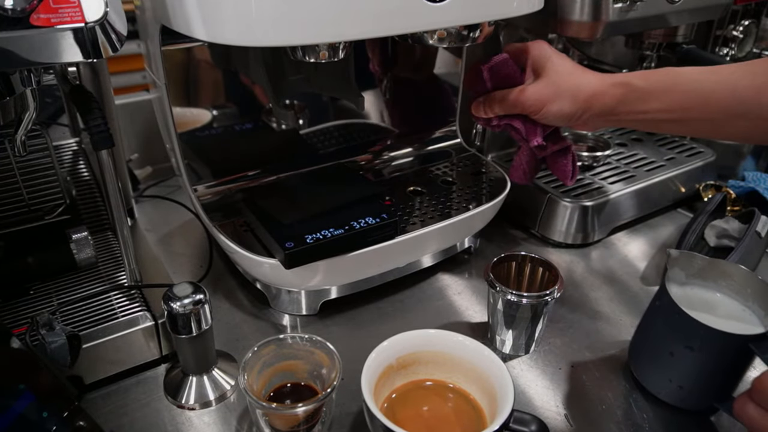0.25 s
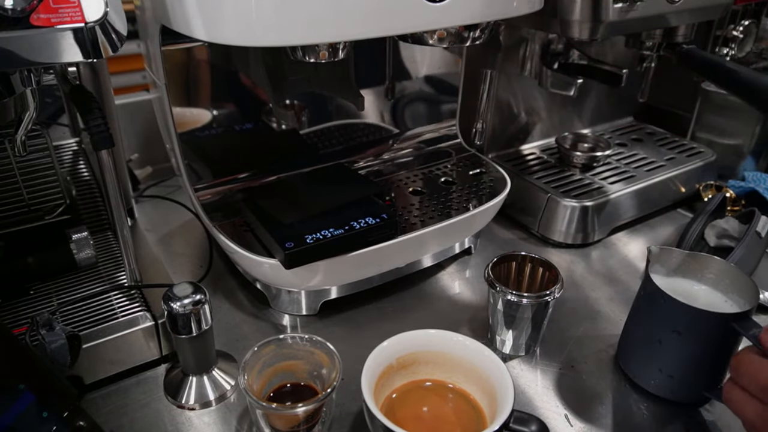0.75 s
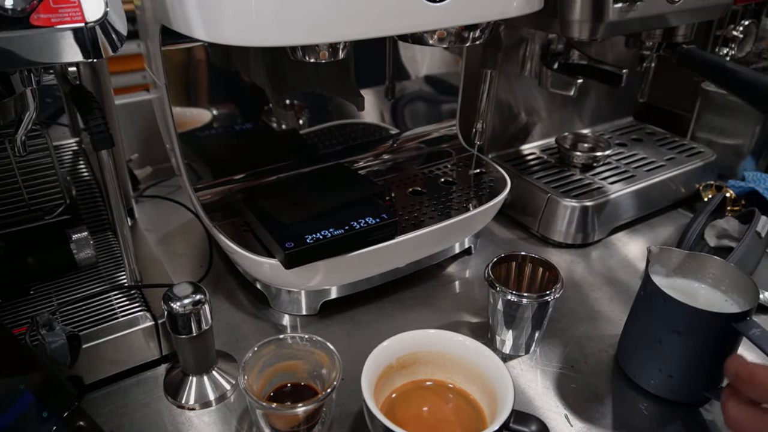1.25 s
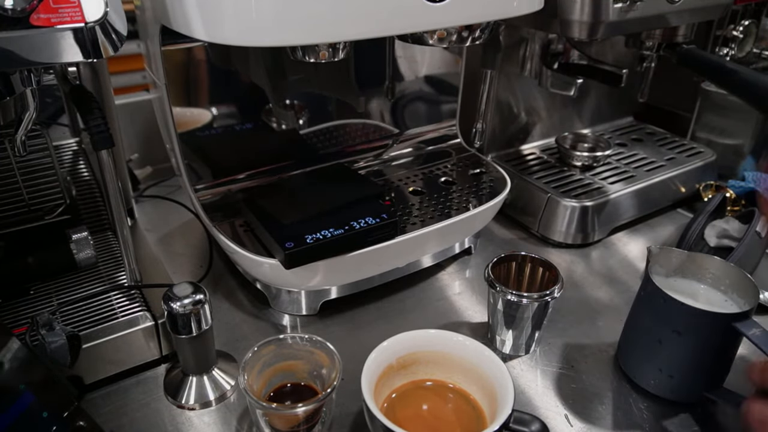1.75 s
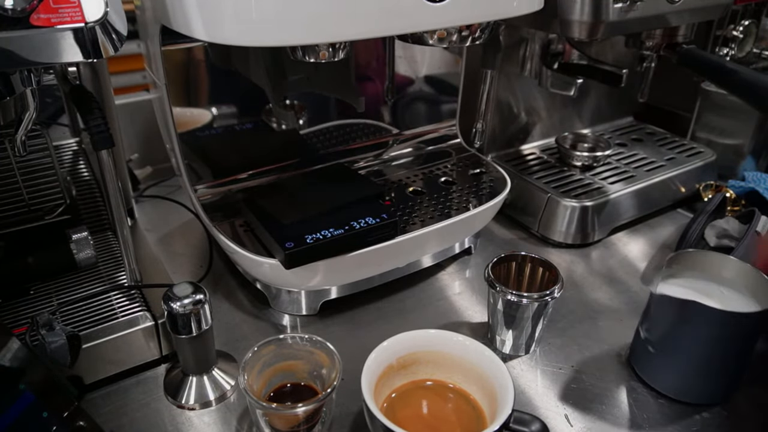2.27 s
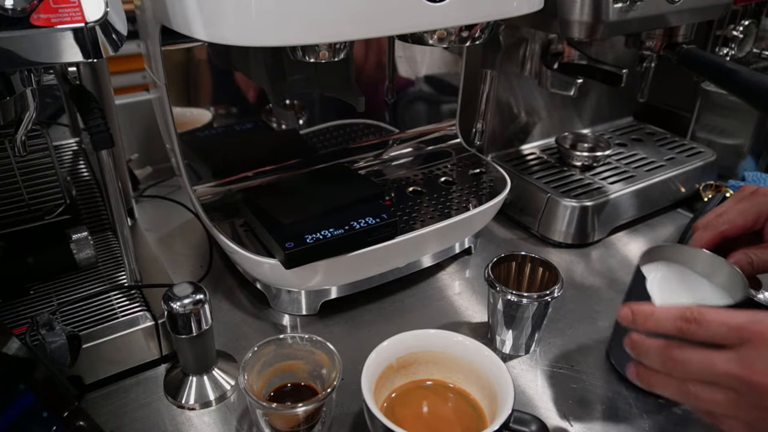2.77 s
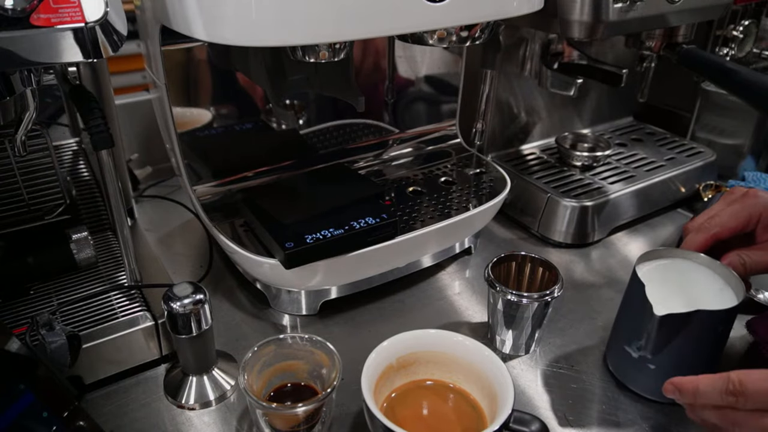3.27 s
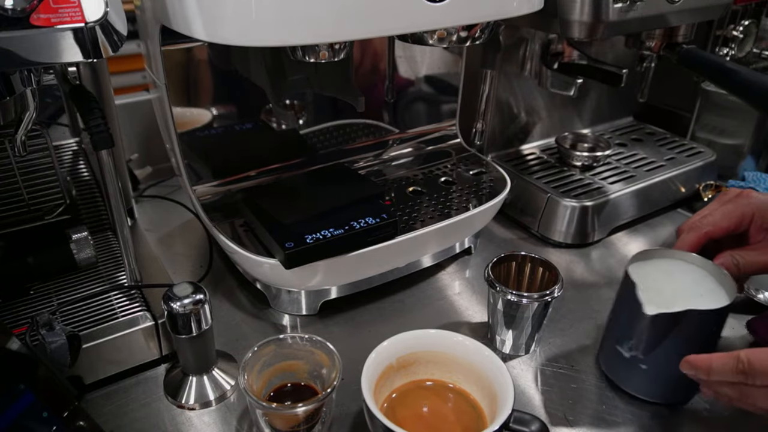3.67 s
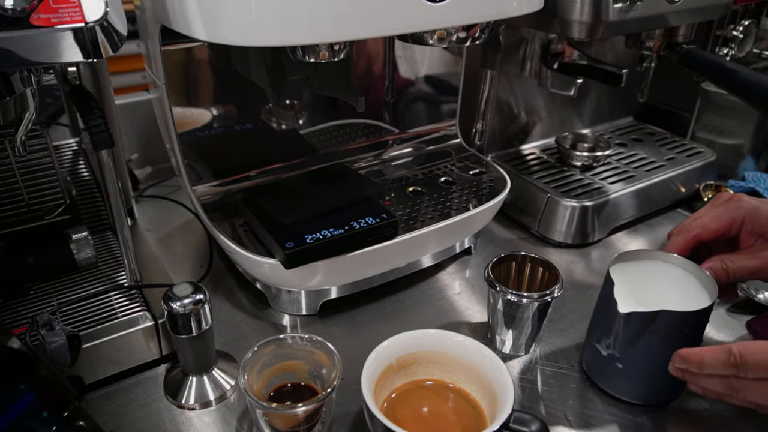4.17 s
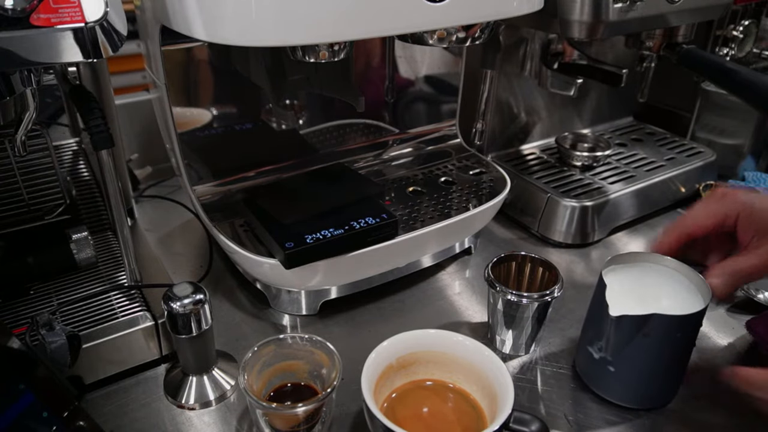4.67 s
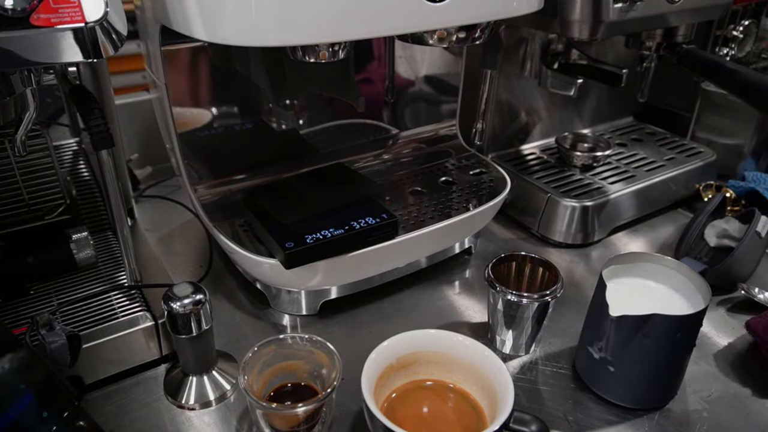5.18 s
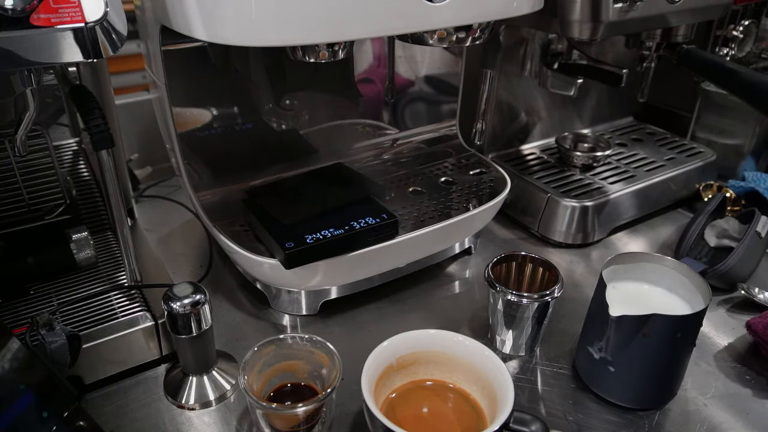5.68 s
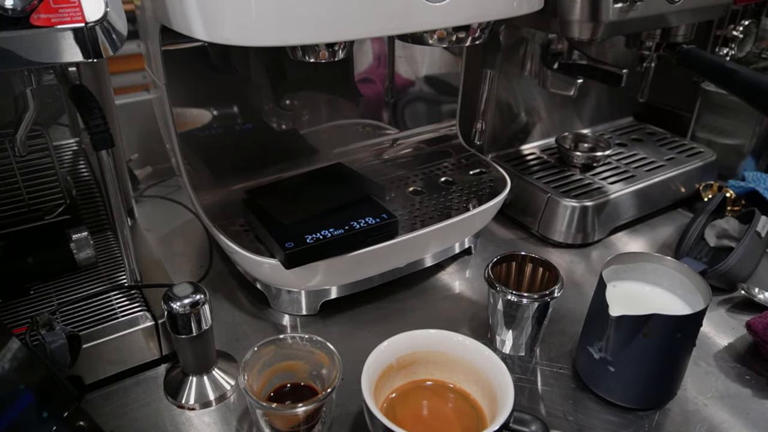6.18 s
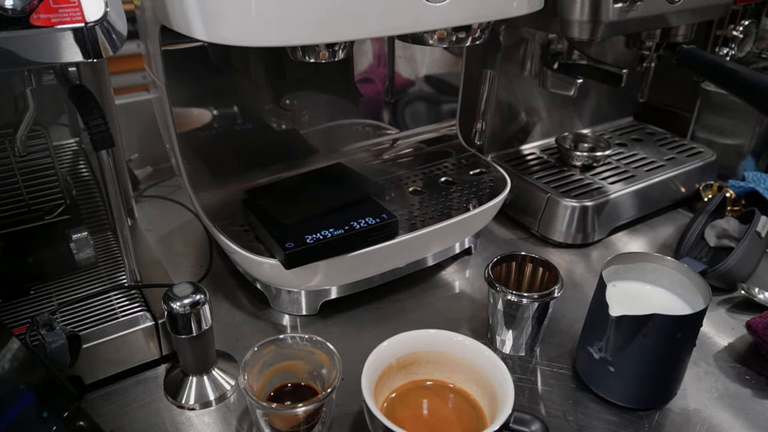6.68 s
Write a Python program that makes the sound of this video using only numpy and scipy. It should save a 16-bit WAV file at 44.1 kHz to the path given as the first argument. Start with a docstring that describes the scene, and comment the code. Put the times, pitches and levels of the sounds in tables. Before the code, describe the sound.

In a quiet coffee preparation area, a cloth wipes faintly and a metal pitcher knocks sharply, then slides and clicks on a steel counter. Close to the microphone, a steam wand sputters wetly, builds into a loud, steady, slightly ringing hiss, then snaps shut, leaving a short fading tail and low watery gurgle.

```python
"""A steam wand blows open, close to the microphone: wet sputter first, then a steady jet of turbulent noise
that rings in the steel housing, and a low gurgle of filtered noise once the valve shuts. Before it a cloth
wipes as grainy noise, and a milk pitcher knocks (noise bursts and damped modes) and slides on a steel counter.
Behind lie a quiet room's noise, a faint hum and a deep rumble, both made of narrow noise."""
import sys
import numpy as np
from scipy import signal
from scipy.fft import rfft, irfft, next_fast_len
from scipy.io import wavfile
from scipy.ndimage import uniform_filter1d, minimum_filter1d, map_coordinates

SR = 44100
rng = np.random.default_rng(int(sys.argv[2]) if len(sys.argv) > 2 else 0)


def output_pcm(signal):
    """Save a mono or channel-first signal as 16-bit PCM at the path in sys.argv[1].

    Samples are clipped to [-1, 1] before scaling.
    """
    pcm = np.clip(np.atleast_2d(signal).T, -1, 1) * 32767
    wavfile.write(sys.argv[1], SR, np.round(pcm).astype(np.int16))


N = 306054
TIME = np.arange(N) / SR  # s

# Stereo width of the jet and of the gurgle. Each row: frequency in Hz, left-right likeness (1 = same).
JET_LIKENESS = [(100, .998), (400, 0.99), (800, 1), (1400, 0.99), (3000, 0.98), (5000, 0.92), (8000, 0.74),
                (13000, 0.61)]
# Stereo width of the rubbing and of the room noise. Each row: frequency in Hz, left-right likeness (1 = same).
WIDE_LIKENESS = [(60, 1.0), (180, 0.82), (550, 0.91), (1650, 0.87), (4970, 0.45), (15000, 0.15)]
OPEN_S, SHUT_S = 3.307, 6.697  # the valve gap begins to widen; the valve shuts


def steam():
    """Turbulent jet noise in three ranges, coloured by the valve gap, the wet nozzle and the steel around."""
    # Roar of the jet. Each row: frequency in Hz, relative density in dB per Hz.
    roar_colour = [(820, -64), (1400, -19), (1770, -2), (1990, -5.5), (2090, -4), (2300, -6), (2880, 1),
                   (3360, -4.5), (3870, -7), (4240, -14), (4500, -14.5), (5850, -45), (9900, -120)]
    # Hiss of the spray. Each row: frequency in Hz, relative density in dB per Hz.
    hiss_colour = [(2470, -39.5), (4200, 0.5), (4390, -21), (4590, -1), (4960, -1.5), (5240, 2), (7150, 0),
                   (7950, 0), (10800, -2), (12700, -2), (15300, -1.5), (15750, -4)]
    # Low body of the jet. Each row: frequency in Hz, relative density in dB per Hz.
    body_colour = [(120, -62), (200, -36), (364, -15), (404, -14), (536, -13), (927, -3.5), (1050, -7),
                   (1200, 2.5), (1550, -5.5), (2020, -13), (3410, -120)]
    # Left-right balance of the jet. Each row: frequency in Hz, left over right in dB.
    jet_balance = [(60, 0.0), (150, 0.0), (380, 0.0), (950, -0.33), (2380, -0.64), (5980, -0.83),
                   (15000, 0.09)]
    widen_s = 0.049  # time constant of the opening gap, slow at first
    gap = (1 - np.exp(-np.clip(TIME - OPEN_S, 0, None) / widen_s)) ** 2
    flow, spray, body = jet_gains(gap)
    add_nozzle_bursts(flow, spray)

    roar = housed_noise(roar_colour, patchy_db=0.6)
    # a narrow valve gap passes only the upper roar
    thin = filtered(roar, lambda hz: radiated(hz, low_hz=2500) ** 2)
    roar = thin + (roar - thin) * gap
    hiss = housed_noise(hiss_colour, patchy_db=1.03)
    low = housed_noise(body_colour, patchy_db=1.0)
    jet = spray * nozzle_whistle() + flow * roar + spray * hiss + body * low

    echoes = steel_echoes()
    balance = lambda hz: amp(np.outer([.5, -.5], along(jet_balance, hz)))
    return filtered(jet, lambda hz: echoes(hz) * balance(hz) * radiated(hz, low_hz=171))


def jet_gains(gap):
    """Gains of roar, spray and low body: one flutter moves all; the shut valve cuts roar and spray only."""
    # Levels of the open jet. Each row: time in seconds, roar in dB, hiss in dB.
    jet_levels = [(3.29, -59, -76), (3.32, -32, -22), (3.36, -28, -27.5), (3.42, -30, -32),
                  (3.56, -26.5, -26.5), (3.68, -23, -27), (3.8, -17, -16.5), (4.22, -14, -17.5),
                  (4.31, -16.5, -18), (4.37, -16, -22), (4.44, -15.5, -18.5), (4.86, -14.5, -18),
                  (5.4, -15.5, -17), (6.1, -14, -17), (6.69, -15.5, -18.5)]
    s, *levels = np.transpose(jet_levels)
    roar_db, hiss_db = [np.interp(TIME, s, db, left=-120) for db in levels]

    snap_s, tail_db, tail_t60_s = .013, -8, .55  # most of the flow dies fast, a weaker tail lingers
    after = np.clip(TIME - SHUT_S, 0, None)
    tail = amp(tail_db - 60 * after / tail_t60_s)
    shut = (1 - amp(tail_db)) * np.exp(-after / snap_s) + tail

    flutter_db = 0.4 * wobble(4.005) + 0.38 * wobble(12) + 0.55 * wobble(70)
    flow = shut * amp(roar_db + flutter_db + 0.34 * wobble(150))
    spray = shut * amp(hiss_db + 1.47 * flutter_db)
    # the low body follows a share of the roar's dB and loses 4 dB per second while sinking
    body_db = -23 + 0.67 * roar_db - 4 * sinking()
    return flow, spray, gap * amp(body_db + 1.25 * flutter_db)


def add_nozzle_bursts(flow, spray):
    """Each burst at the nozzle, first the valve's opening pop and then slugs of water: a sudden rise and quick
    decay of roar and spray, in place."""
    # Bursts at the nozzle: the valve's opening pop, then slugs of water. Each row: start in seconds, spray in
    # dB, roar in dB, both before the burst's envelope.
    bursts = [(3.31, -22, -23), (3.329, -27, -40), (3.359, -28, -38), (3.394, -17, -32), (3.556, -16.5, -34),
              (3.723, -13.5, -21), (3.770, -14, -14), (3.819, -18, -30), (4.428, -17, -20),
              (5.179, -34, -28)]
    t60_s, rise_s = .04, 0.0011
    t = TIME[:SR // 8]
    shape = amp(-60 * t / t60_s) * (1 - np.exp(-t / rise_s))
    for s, spray_db, roar_db in bursts:
        at = slice(round(s * SR), round(s * SR) + len(t))
        spray[at] += amp(spray_db) * shape
        flow[at] += amp(roar_db) * shape


def housed_noise(colour, patchy_db):
    """One range of the jet's noise, lifted at the resonances of the steel housing."""
    # Resonances that the jet excites. Each row: frequency in Hz, width in Hz, lift in dB.
    housing = [(950, 40, 7), (1215, 21, 8), (1710, 11, 4.5), (1840, 24, 6.5), (2126, 41, 6),
               (2274, 76, 6.5), (2545, 96, 6.5), (2940, 61, 2.5), (3330, 88, -1), (3585, 36, 7.5),
               (3854, 48, 7.5), (4670, 130, 5), (5270, 300, 1.5), (6130, 120, 3.5), (6810, 120, 4.5),
               (7320, 170, 3.5), (12140, 100, 5), (12700, 400, 6.5), (13100, 300, -3), (13900, 180, 4)]
    lift_db = lambda hz: sum(db / (1 + (2 * (hz - c) / w) ** 2) for c, w, db in housing)
    return rush(lambda hz: along(colour, hz) + lift_db(hz), JET_LIKENESS, patchy_db)


def nozzle_whistle():
    """The wet nozzle whistles at first: narrow noise that fades, before the spray's gain."""
    under_spray_db, fade_s = -8, 0.26  # fade_s is a time constant
    fade = np.exp(-np.clip(TIME - OPEN_S, 0, None) / fade_s)
    return amp(under_spray_db) * fade * narrow(4650, width_hz=80)


def steel_echoes():
    """Frequency response of the direct sound plus ten weak treble echoes off nearby steel."""
    each_db, longest_s = -21, .012
    delays = rng.uniform(0.1001, 1, 10) * longest_s
    late = lambda hz: sum(np.exp(-2j * np.pi * hz * d) for d in delays)
    return lambda hz: 1 + amp(each_db) * radiated(hz, low_hz=4200) * late(hz)


def machine():
    """Throbs and gurgling water, both too small in source to carry deep bass."""
    return filtered(gurgle() + throbs(), lambda hz: radiated(hz, low_hz=85))


def gurgle():
    """Water gurgles as the valve shuts: unsteady noise with a low, broad colour."""
    # Swells of the gurgle, silent outside these times. Each row: time in seconds, level in dB.
    swells = [(6.65, -52), (6.672, -36), (6.684, -38), (6.732, -40), (6.754, -33), (6.842, -34),
              (6.856, -31), (6.94, -39.5)]
    # Colour of the water. Each row: frequency in Hz, relative density in dB per Hz.
    drain_colour = [(59, -67), (100, -38), (271, -9.5), (541, -6.5), (707, -4), (759, -9), (1160, -13.5),
                    (1440, -23), (2170, -18), (5660, -16), (7000, -18.5), (9100, -46), (15400, -120)]
    s, db = np.transpose(swells)
    level_db = np.interp(TIME, s, db, left=-120, right=-120)
    return amp(level_db + 0.93 * wobble(45)) * rush(lambda hz: along(drain_colour, hz), JET_LIKENESS, patchy_db=1)


def throbs():
    """Short dull throbs through machine and counter: two tones whose phase drifts, so no clean note."""
    # Each row: start in seconds, level in dB, frequency in Hz, length in seconds.
    pulses = [(.65, -60, 104, .1), (3.28, -48, 350, 0.028), (3.306, -39.5, 400, 0.076),
              (3.797, -39, 413, 0.072), (4.283, -40.5, 402, 0.11), (4.803, -55, 403, 0.057),
              (6.663, -35, 472, 0.017)]
    out = np.zeros(N)
    for s, db, hz, length in pulses:
        t = TIME[:round(length * SR)]
        wander = uniform_filter1d(np.cumsum(rng.standard_normal(len(t))), size=90) * 0.058
        tones = np.sin(2 * np.pi * hz * t + wander)
        tones = tones + 0.27 * np.sin(2 * np.pi * hz * .85 * t - wander)
        swell = np.sin(np.pi * t / length) ** 0.75
        out[round(s * SR):][:len(t)] += amp(db) * swell * tones
    return out


def knocks():
    """Each contact is a short click of its own colour over a thud; both stir the damped modes of the steel."""
    # Contacts on the counter, and last a tick of the valve after it shuts. Each row: start in seconds, click in
    # dB, click centre in Hz, click t60 in seconds, # thud in dB, thud t60 in seconds; levels before the attack.
    contacts = [(.648, -37, 3000, 0.054, -31.5, 0.091), (.659, -33, 3380, 0.074, -34, 0.12),
                (0.9113, -35, 4180, 0.012, -58, .035), (1.1766, -13.5, 5130, 0.01, -42, .03),
                (1.182, -11.5, 4870, 0.015, -27, 0.2), (1.208, -16, 6460, 0.015, -28.5, .045),
                (1.217, -17, 2930, 0.017, -25, 0.12), (1.76, -29, 3000, 0.037, -47, .045),
                (1.7648, -19.5, 12000, .028, -46, .03), (1.7675, -16, 2700, 0.018, -25, 0.03),
                (1.881, -45, 3500, .03, -42, .06), (2.671, -34, 11000, 0.019, -52, .03),
                (2.769, -44, 4990, .02, -43, .031), (2.878, -30, 2600, .06, -28.5, 0.078),
                (2.909, -43, 2500, .05, -38.5, .06), (2.99, -50, 2500, .04, -47, .055),
                (6.851, -28, 9000, .025, -27, .036)]
    # Modes of pitcher and counter. Each row: frequency in Hz, relative level in dB, t60 in seconds.
    steel_modes = [(325, -4.5, 0.15), (670, -4, .05), (854, 0, 0.16), (1055, 7.5, 0.05), (1240, 7, .04),
                   (1940, -1, 0.049), (2365, 0, 0.027), (2590, 1.5, 0.025), (2980, -9, 0.078),
                   (3260, -0.5, 0.032), (4270, 4, 0.015), (5420, 2, 0.018), (6650, -3, .025),
                   (8800, -13, 0.017), (11100, -14, 0.018), (11000, 0, .02)]
    rise_share = 0.067  # attack time constant as a share of the click's t60
    ring_db, room_db = -8, -6  # modes; send to the room
    near, sent, t = np.zeros(N), np.zeros(N), TIME[:SR // 12]
    f = np.fft.rfftfreq(len(t), 1 / SR)
    hz, level_db, life = np.transpose(steel_modes)[:, :, None]
    dull = radiated(f, low_hz=302) / (1 + (f / 1500) ** 3)
    for s, click_db, click_hz, click_t60, thud_db, thud_t60 in contacts:
        click_noise, thud_noise = rfft(rng.standard_normal((2, len(t))))
        bright = lambda f: radiated(f, low_hz=1400) * (
            0.073 + 1 / (1 + (np.log((f + 1) / click_hz) / 0.5) ** 2))
        click = amp(click_db - 60 * t / click_t60) * unit(irfft(click_noise * bright(f), len(t)))
        thud = amp(thud_db - 60 * t / thud_t60) * unit(irfft(thud_noise * dull, len(t)))

        # the thud stirs modes under 1500 Hz, the click those above; each hit varies their level and phase
        reach = np.where(hz < 1500, amp(thud_db), amp(click_db) * bright(hz))
        luck_db, luck_phase = rng.standard_normal((2, len(steel_modes), 1))
        decay = amp(level_db + 3.0 * luck_db - 60 * t / life)
        modes = reach * decay * np.sin(2 * np.pi * hz * t + 2 * luck_phase)

        attack = 1 - np.exp(-t / (rise_share * click_t60))
        at = slice(round(s * SR), round(s * SR) + len(t))
        near[at] += attack * (click + thud + amp(ring_db) * modes.sum(axis=0))
        sent[at] += attack * amp(room_db) * (click + thud)
    return filtered(near + room(sent), lambda hz: radiated(hz, low_hz=184))


def rubbing():
    """Cloth and pitcher base drag over steel: grainy noise, low scrape and treble swish under each stroke."""
    # Wiping and sliding. Each row: start, peak and end in seconds, scrape in dB, swish relative to it in dB.
    strokes = [(.12, 0.383, .66, -52, -9), (0.648, .69, 1.02, -49.5, -6.5), (1.77, 1.903, 2.23, -50, -1),
               (1.863, 2.117, 2.215, -45.5, -5.5), (2.207, 2.307, 2.54, -46.5, -5.5),
               (2.52, 2.8, 3.06, -52, -4), (2.864, 2.877, 3.18, -44.5, -8)]
    # Low scrape. Each row: frequency in Hz, relative density in dB per Hz.
    scrape_colour = [(180, -43), (300, -22), (407, -9.5), (494, -13.5), (900, -9), (986, -1.5), (1350, -9),
                     (1550, -5.5), (4500, -12), (5850, -21), (9900, -120)]
    # Treble swish. Each row: frequency in Hz, relative density in dB per Hz.
    swish_colour = [(2060, -21), (3500, -6.5), (4770, -12), (6100, -7), (8570, -12), (11700, -11),
                    (15100, -15), (15800, -38)]
    # A brighter swish as the pitcher turns. In order: start, peak and end in seconds, level in dB.
    turn_stroke = (2.21, 2.28, 2.52, -50)
    # Its colour. Each row: frequency in Hz, relative density in dB per Hz.
    turn_colour = [(2650, -37), (4500, -15), (5630, 3), (6230, -5), (7890, -6), (8500, -10), (11000, -40),
                   (18700, -120)]
    noise = lambda colour, patchy_db: rush(lambda hz: along(colour, hz), WIDE_LIKENESS, patchy_db)
    scrape = sum(stroke(*row) for *row, treble_db in strokes)
    scrape = scrape * amp(0.7 * wobble(60) + 0.74 * wobble(400))
    swish = sum(amp(treble_db) * stroke(*row) for *row, treble_db in strokes)
    swish = swish * amp(1.2 * wobble(90))
    return (scrape * noise(scrape_colour, patchy_db=1.4)
            + swish * noise(swish_colour, patchy_db=1.6)
            + stroke(*turn_stroke) * noise(turn_colour, patchy_db=1.2)
            + squeak())


def squeak():
    """A faint thin whistle: narrow noise that swells and fades once."""
    start_s, end_s = 1.04, 1.14
    swell = np.sin(np.pi * np.clip((TIME - start_s) / (end_s - start_s), 0, 1))
    return amp(-66) * swell * narrow(6600, width_hz=120)


def stroke(start, peak, end, db):
    """Gain of one stroke: it swells as a power of time, then fades evenly in dB and stops at its end."""
    rise_power, fall_db = 0.85, 17
    swell = np.clip((TIME - start) / (peak - start), 0, 1) ** rise_power
    fade_db = fall_db * np.clip((TIME - peak) / (end - peak), 0, None)
    return swell * amp(db - fade_db) * (TIME < end)


def background():
    """Room noise and a blurred hum that fade slowly from 4.09 s and stay low, over a deep unsteady rumble."""
    # The room's steady noise. Each row: frequency in Hz, relative density in dB per Hz.
    air_colour = [(15, -68), (25, -38), (96, -19), (222, -7), (473, -10.5), (542, -6.5), (691, -7),
                  (834, -4), (981, -6.5), (1250, -7.5), (1730, -7), (2330, -10), (15800, -30.5)]
    air = amp(-53.5 + 0.29 * wobble(2.6)) * rush(lambda hz: along(air_colour, hz), WIDE_LIKENESS, patchy_db=1.0)
    hum = amp(-69.5) * narrow(215, width_hz=18)
    rumble = amp(-87.5 + 3.3 * wobble(7)) * narrow(88, width_hz=90)
    return amp(-11.6 * sinking()) * (air + hum) + rumble  # air and hum lose 11.6 dB per second


def sinking():
    """Seconds of slow fading so far, counted from 4.09 s; holds its last value once the valve shuts."""
    sink_s = 4.09
    return np.clip(TIME, sink_s, SHUT_S) - sink_s


def room(x):
    """Reverberation: each frequency dies at its own speed; the channels share part of the answer."""
    # Decay of the room. Each row: frequency in Hz, t60 in seconds.
    room_decay = [(200, 0.29), (1000, 0.41), (4000, 0.42), (12000, 0.24)]
    hz, t, z = signal.stft(rng.standard_normal((2, SR // 2)), SR, nperseg=256)
    decay = amp(-60 * t / along(room_decay, hz)[:, None])
    shared, apart = signal.istft(z * decay, SR, nperseg=256)[1]
    tail = shared + np.outer([1, -1], .4 * apart)
    late = np.pad(x, (200, 0))[None]  # the answer starts 200 samples late
    return signal.fftconvolve(late, tail / np.linalg.norm(tail[0]), axes=1)[:, :N]


def rush(colour_db, alike, patchy_db):
    """Stereo noise of rms 1 with patches of random gain in time and frequency."""
    z = signal.stft(rng.standard_normal((2, N)), nperseg=512)[2]
    field = uniform_filter1d(rng.standard_normal(z.shape[1:]), size=5, axis=0)
    field = uniform_filter1d(field, size=8, axis=1)
    pair = signal.istft(z * amp(patchy_db * unit(field)), nperseg=512)[1][:, :N]
    # the angle between mid and side sets how alike left and right are
    turn = lambda hz: np.arccos(np.clip(along(alike, hz), -1, 1)) / 2
    mid, side = filtered(pair, lambda hz: amp(colour_db(hz)) * [np.cos(turn(hz)), np.sin(turn(hz))])
    return unit(np.array([mid + side, mid - side]))


def narrow(hz, width_hz):
    """Noise of rms 1 inside one resonance."""
    return unit(filtered(rng.standard_normal(N), lambda f: 1 / (1 + (2 * (f - hz) / width_hz) ** 2)))


def radiated(hz, low_hz):
    """Small sources radiate no deep bass: the response falls below low_hz."""
    return 1 / np.sqrt(1 + (low_hz / (hz + 1)) ** 8)


def filtered(x, response):
    """x times a response of frequency."""
    m = next_fast_len(N + 8192)
    return irfft(rfft(x, m) * response(np.fft.rfftfreq(m, 1 / SR)), m)[..., :N]


def wobble(rate):
    """A smooth random curve, rate knots a second."""
    knots = rng.standard_normal(int(N * rate / SR) + 4)
    return map_coordinates(knots, [TIME * rate])


def along(points, hz):
    """Value at hz of a table of (Hz, value) points, read on a log frequency axis."""
    f, v = np.transpose(points)
    return np.interp(np.log(hz + 1), np.log(f + 1), v)


def amp(db):
    """Decibels to linear gain."""
    return 10 ** (np.asarray(db) / 20)


def unit(x):
    """x scaled to rms 1."""
    return x / np.sqrt(np.mean(x ** 2) + 1e-20)


def scene():
    """The steam wand up front, then machine, counter and room."""
    return steam() + machine() + knocks() + rubbing() + background()


def record(dry):
    """Close microphone ports agree in the bass; a limiter holds the peaks; nothing passes the band limit."""
    top_hz = 15760
    mid, side = dry.mean(axis=0), (dry[0] - dry[1]) / 2
    side = filtered(side, lambda hz: radiated(hz, low_hz=475))
    pair = filtered(np.array([mid + side, mid - side]), lambda hz: hz < top_hz)
    need = np.minimum(1, .985 / (np.abs(pair).max(axis=0) + 1e-9))
    gain = uniform_filter1d(minimum_filter1d(need, size=401), size=200)
    return filtered(pair * gain, lambda hz: hz < top_hz)


dry = scene()
out = record(dry)
output_pcm(out)
```